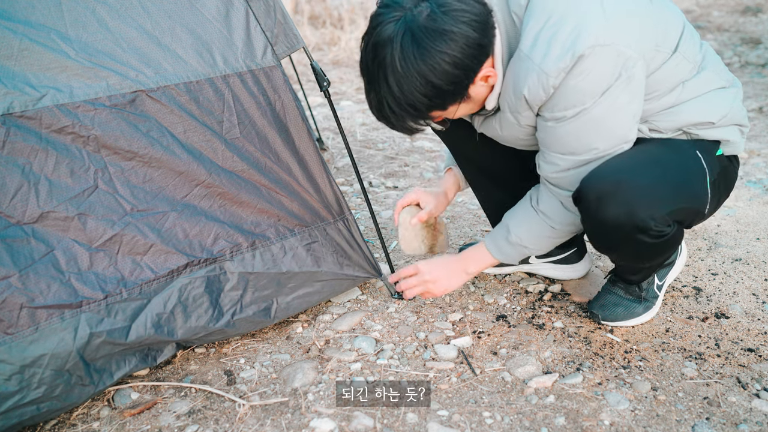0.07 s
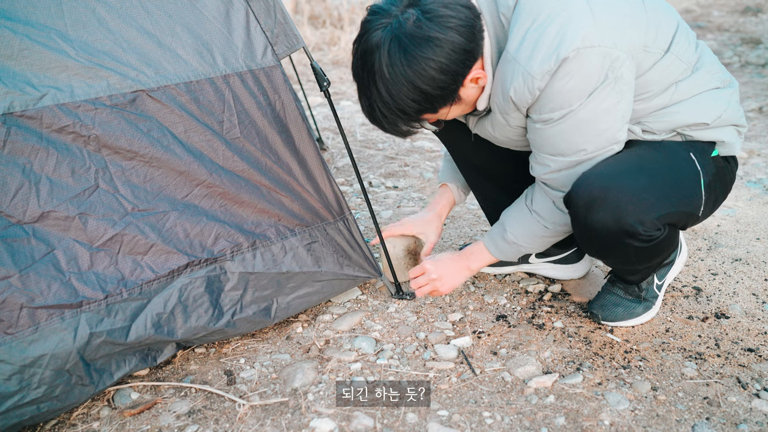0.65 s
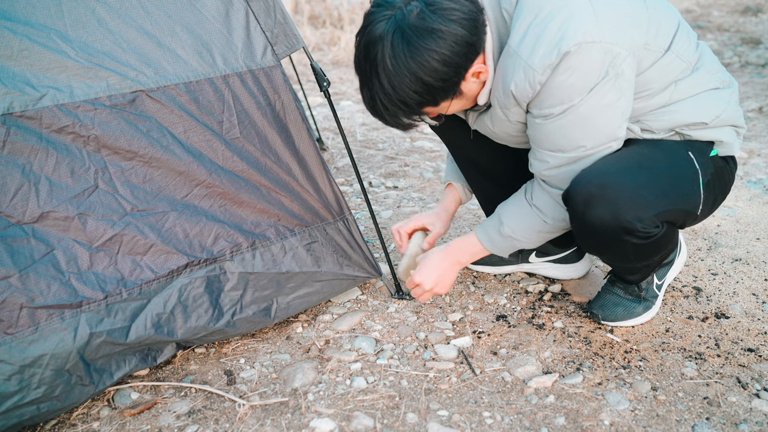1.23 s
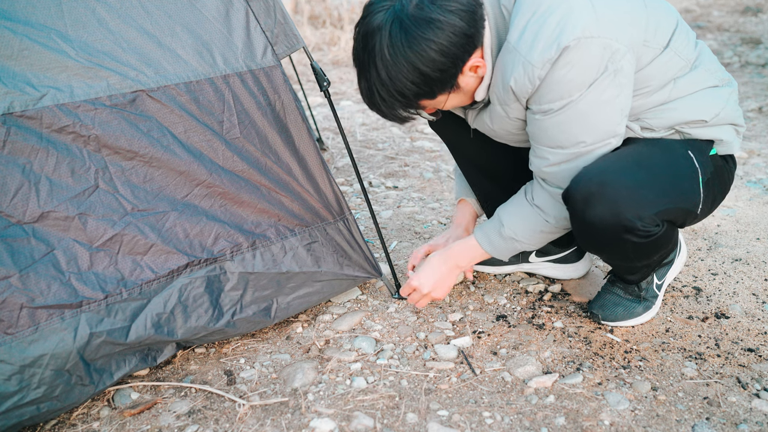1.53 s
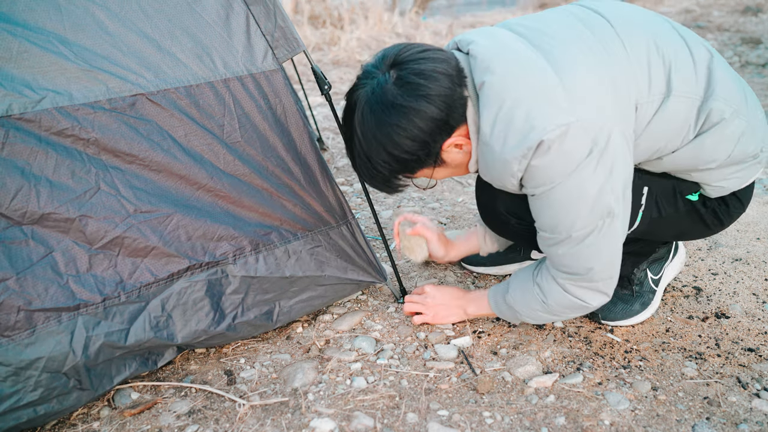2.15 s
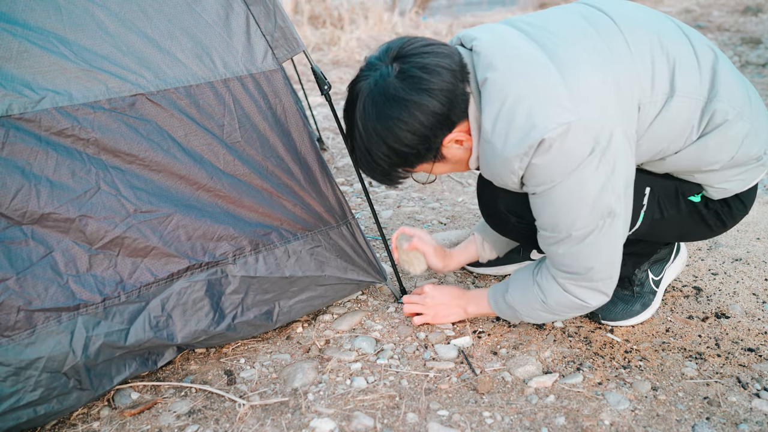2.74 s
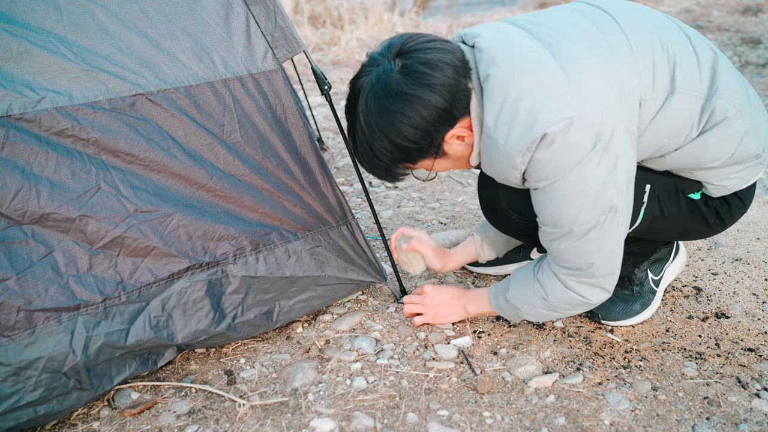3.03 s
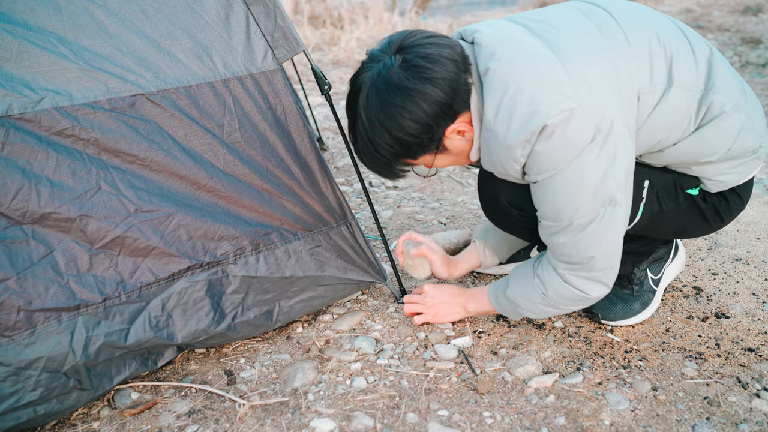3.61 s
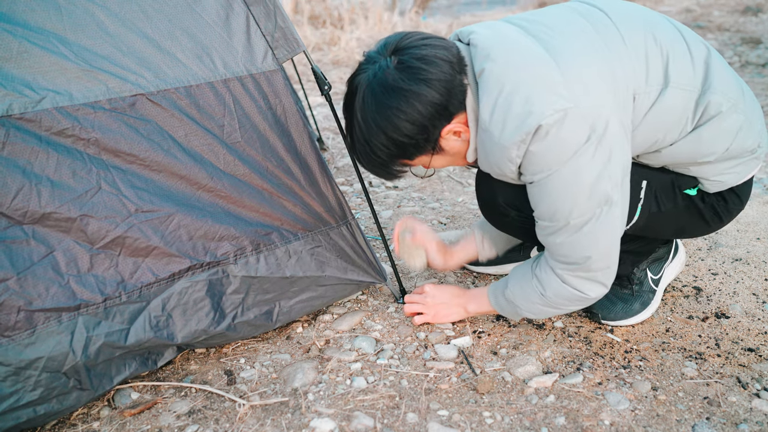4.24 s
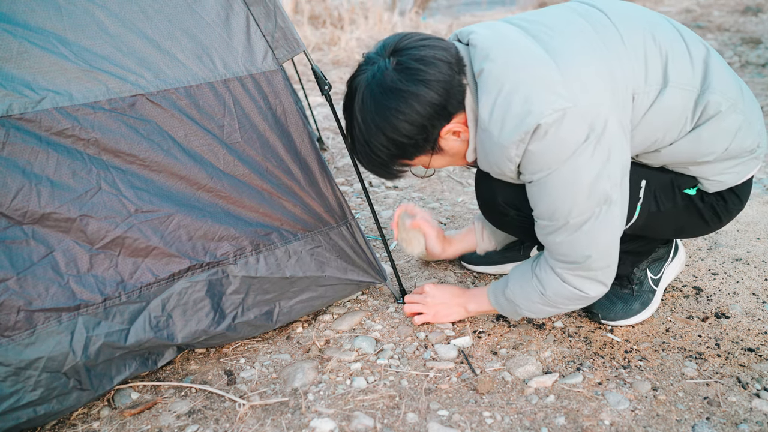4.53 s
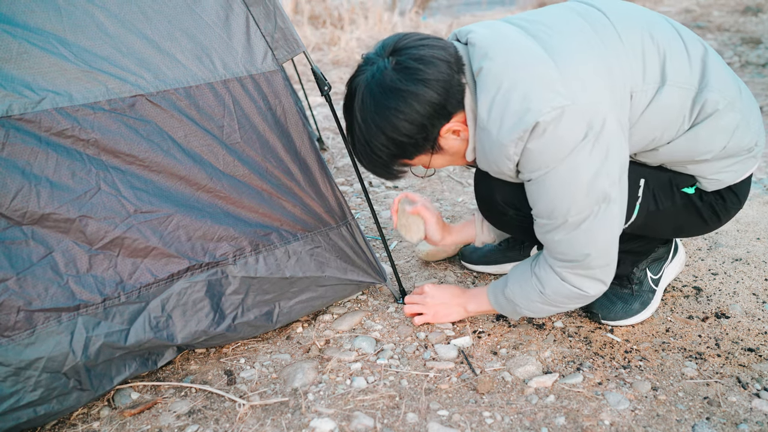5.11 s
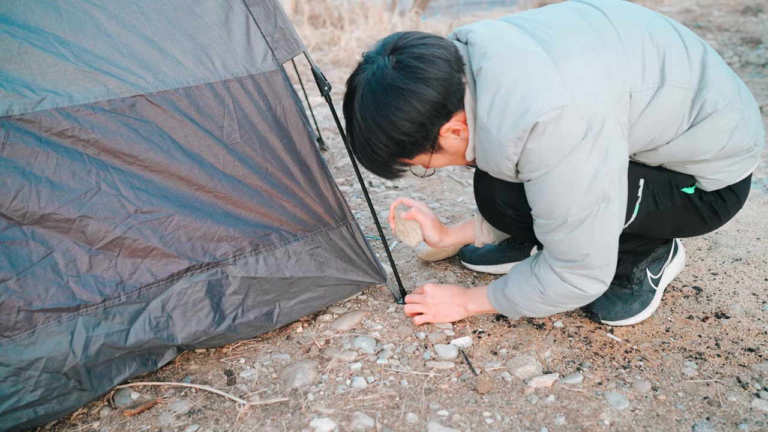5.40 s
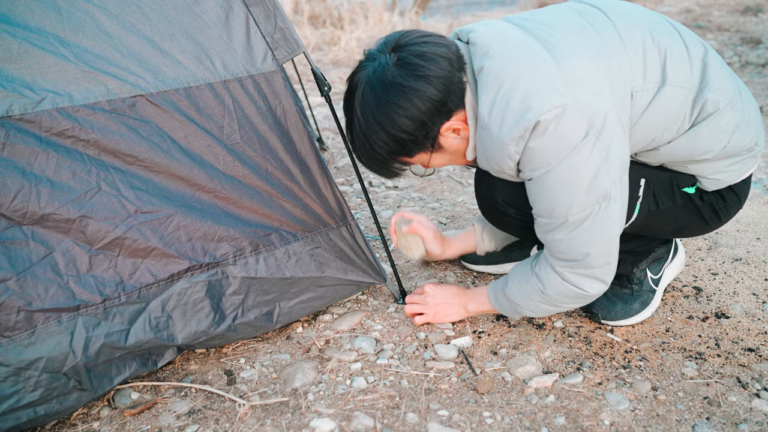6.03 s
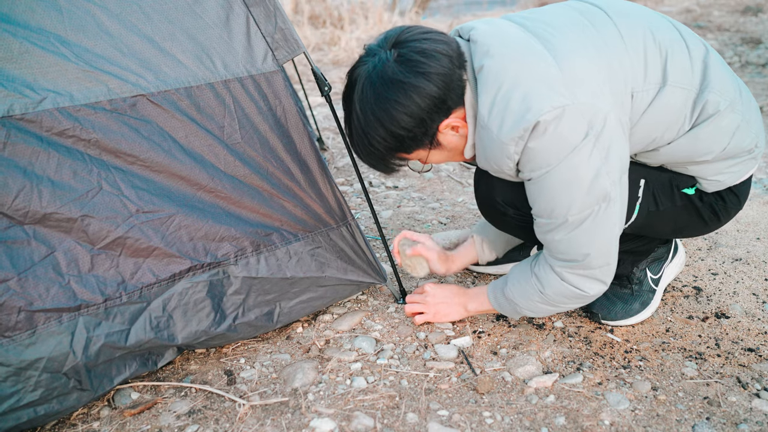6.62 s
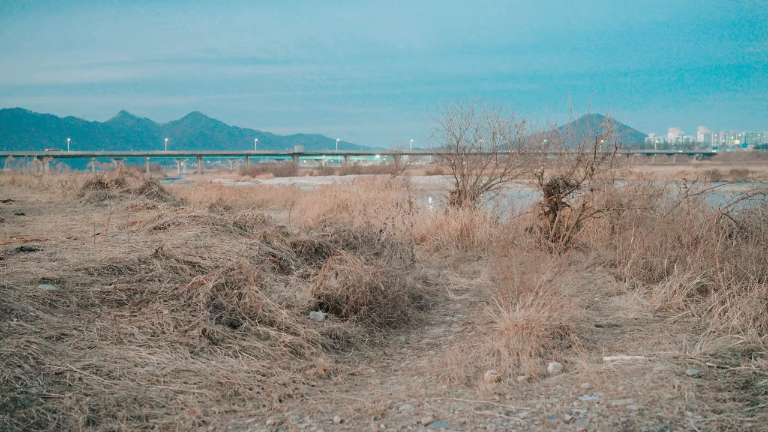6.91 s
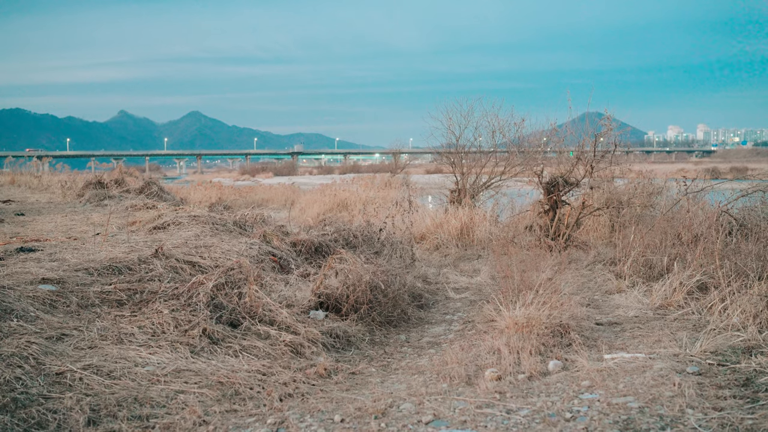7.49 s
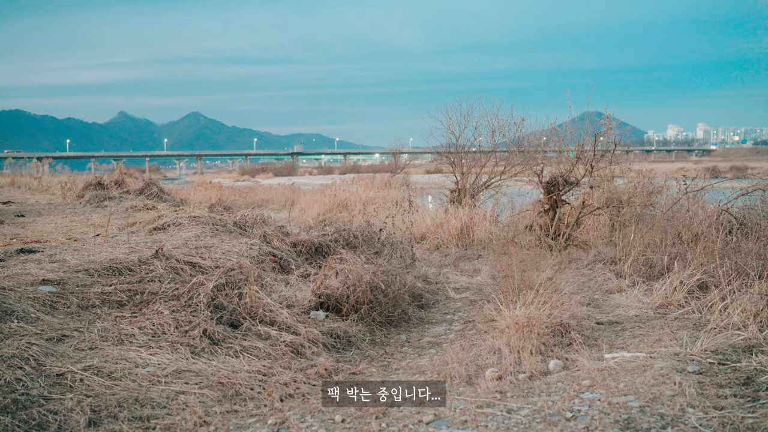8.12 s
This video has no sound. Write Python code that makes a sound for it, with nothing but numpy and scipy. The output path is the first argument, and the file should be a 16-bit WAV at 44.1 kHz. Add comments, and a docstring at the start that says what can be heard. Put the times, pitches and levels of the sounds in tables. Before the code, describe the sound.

A faint, low outdoor murmur runs throughout. For the first two seconds, hands slide over nylon tent fabric in uneven, crackly strokes, while pebbles click and a steel peg scrapes softly against soil and stone. At about 2.5 seconds a rock starts knocking the peg into the stony ground: fourteen evenly spaced blows, about three a second, until roughly 6.7 seconds. These are the loudest sounds. Each has a short, high metal clink, a crunch of grit and a dull thud, and the thuds sink slightly in pitch as the peg goes deeper. Sometimes the rock skids and clinks again, and a padded sleeve swishes faintly between blows. At about 7 seconds the background changes to a quiet riverside with a faint rush of far traffic. Soft dry rustling comes and goes, with two small ticks, until the end at about 8.4 seconds.

```python
"""A rock knocks a steel tent peg into stony ground: fourteen blows, each with a short clink
from the peg, a crunch of grit and a falling thud from the soil. Before that, hands slide over
the nylon tent corner and set the peg; between blows a padded sleeve swishes.
A low murmur lies under everything. At the end the scene changes to an open riverside
with dry rustling and far traffic."""
import sys
import numpy as np
from scipy import signal
from scipy.fft import rfft, irfft, next_fast_len
from scipy.io import wavfile

SR = 44100
rng = np.random.default_rng(int(sys.argv[2]) if len(sys.argv) > 2 else 0)


def transcribe(signal):
    """Save signal, clipped to [-1, 1], as a 16-bit WAV file at the path in sys.argv[1]."""
    frames = np.atleast_2d(signal).T
    limited = np.clip(frames, -1, 1)
    pcm = np.round(limited * 32767).astype(np.int16)
    wavfile.write(sys.argv[1], SR, pcm)


N = 363951
TIME = np.arange(N) / SR  # seconds since the start
AGE = np.arange(SR // 4) / SR  # seconds since one short sound began


def undb(db):
    """Turn decibels into a number to multiply by."""
    return 10 ** (np.asarray(db) / 20)


def noise(spectrum, size, grain_db=0):
    """Noise of strength (rms) 1, shaped by (Hz, dB) points; grain_db makes it uneven and crackly."""
    grains = undb(grain_db * np.minimum(rng.exponential(size=size), 2 * np.pi))
    white = rng.standard_normal(size) * grains
    hz, db = np.transpose(spectrum)
    padded = next_fast_len(size)
    f = np.maximum(np.fft.rfftfreq(padded, 1 / SR), 1)
    bass_cut = np.minimum(f / hz[0], 1) ** 2
    gain = undb(np.interp(np.log(f), np.log(hz), db)) * bass_cut
    shaped = irfft(rfft(white, padded) * gain, padded)[:size]
    return shaped / shaped.std()


def flutter(rate_hz, depth_db):
    """A loudness that wanders at random."""
    points = rng.standard_normal(1024)
    return undb(depth_db * np.interp(TIME * rate_hz, np.arange(len(points)), points))


def fade(t60, rise_s):
    """A quick smooth rise, and a fall of 60 dB every t60 seconds."""
    return (1 - np.exp(-AGE / rise_s)) ** 2 * np.exp(-np.log(1000) * AGE / t60)


def swell(t, centre, width):
    """A bell-shaped rise and fall."""
    return np.exp(-0.5 * ((t - centre) / width) ** 2)


def stroke(start, length, attack_s, release_s):
    """The loudness of a slide: it gathers speed, holds and dies away."""
    since = TIME - start
    return np.clip(since / attack_s, 0, 1) * np.exp(-np.maximum(since - length, 0) / release_s)


def add(track, t, sound):
    """Mix a sound into the track at t seconds."""
    i = int(t * SR)
    track[i:i + len(sound)] += sound[:N - i]


# tone of the low and the middle part of the murmur: f/Hz, level/dB
LOW_TONE = [(25, -23.5), (60, -6), (130, 0), (200, 0.5), (400, -3), (600, -13), (1000, -16.5),
            (2200, -22.5), (4000, -24), (6000, -24), (9000, -31.5), (15500, -37)]
MIDDLE_TONE = [(150, -9.5), (400, 2.5), (650, -0.5), (1050, -8.5), (1700, -22.5), (4000, -56)]
# stretches of background, the last at the riverside: start t/s, low level/dB, middle level/dB
BACKGROUNDS = [(0, -50.5, -62), (2.16, -51.5, -56), (6.97, -52, -73)]
RIVERSIDE_S = BACKGROUNDS[-1][0]
def outdoors():
    """A low distant murmur that differs a little from one stretch to the next."""
    start, low_db, middle_db = np.transpose(BACKGROUNDS)
    now = np.searchsorted(start[1:], TIME)
    low = undb(low_db[now]) * flutter(5.8, 0.32) * noise(LOW_TONE, N)
    middle = undb(middle_db[now]) * flutter(7.0, 0.72) * noise(MIDDLE_TONE, N)
    return low + middle


# tone of rubbed nylon and of scraped soil: f/Hz, level/dB
NYLON_TONE = [(800, -16.5), (2500, -10), (4000, -7), (5500, 3), (7000, -1.5), (8300, -12.5), (10000, -28.5),
              (15500, -31.5)]
SCRAPE_TONE = [(100, -0.5), (300, 7), (750, -2), (1650, -4), (2800, -10.5), (5000, -18), (12000, -45)]
# hand movements: start t/s, length/s, nylon level/dB, scrape level/dB
HAND_STROKES = [(0.0, 0.02, -59, -52), (0.14, 0.1, -68, -72), (0.377, 0.13, -48.5, -51.5),
                (0.45, 0.066, -53.5, -52), (0.672, 0.025, -43, -49), (0.802, 0.037, -45.5, -53),
                (0.898, 0.063, -42, -53), (0.943, 0.018, -60, -63), (1.025, 0.054, -62, -54.5),
                (1.248, 0.15, -60.5, -61), (1.49, 0.22, -64, -55), (1.547, 0.03, -72, -55),
                (1.718, 0.32, -64, -75.5)]
def handling():
    """Nylon slides under the hands in uneven, crackly strokes while the peg scrapes the soil."""
    nylon = flutter(70.95, 2.9) * noise(NYLON_TONE, N, grain_db=5)
    scrape = flutter(60.2, 0.9) * noise(SCRAPE_TONE, N, grain_db=5)
    out = np.zeros(N)
    for t, length, nylon_db, scrape_db in HAND_STROKES:
        movement = stroke(t, length, attack_s=0.031, release_s=0.031)
        out += movement * (undb(nylon_db) * nylon + undb(scrape_db) * scrape)
    return out


# tone of a knocked pebble: f/Hz, level/dB
PEBBLE_TONE = [(120, -9.5), (230, 1), (420, 0.5), (900, -38), (3000, -58)]
# pebble and cloth ticks: t/s, knock level/dB, clack level/dB, snap level/dB
SMALL_TICKS = [(0.367, -30, -44, -52), (.456, -32.5, -46.5, -50), (.508, -28.5, -36.5, -42),
               (0.513, -33, -40, -33), (.634, -33, -44.5, -47), (0.6984, -39, -45, -29.5),
               (0.8323, -41, -60, -30.5), (0.893, -36, -42, -48), (0.911, -38.5, -47, -32),
               (.941, -45, -36, -40), (0.983, -47, -45, -34), (1.107, -39, -46, -43),
               (1.378, -47, -59, -39.5), (1.489, -46, -43, -44), (1.544, -35.5, -42, -58),
               (1.574, -34, -40, -48), (1.592, -50, -43, -57), (1.872, -51, -51.5, -42),
               (2.165, -35, -54, -51), (7.504, -58, -59.5, -34), (7.753, -43, -45, -40)]
def pebbles_and_folds():
    """Pebbles knock and clack, and folds of cloth snap, each in a tiny burst of noise."""
    out = np.zeros(N)
    for t, knock_db, clack_db, snap_db in SMALL_TICKS:
        knock = undb(knock_db) * noise(PEBBLE_TONE, len(AGE)) * fade(0.038, rise_s=0.00084)
        clack = undb(clack_db) * noise(SCRAPE_TONE, len(AGE)) * fade(0.037, rise_s=0.00004)
        snap = undb(snap_db) * noise(NYLON_TONE, len(AGE)) * fade(0.0071, rise_s=0.00005)
        add(out, t, knock + clack + snap)
    return out


# tone of the thin ring: f/Hz, level/dB
THIN_RING_TONE = [(1200, -25), (1440, -4), (1550, -3), (1700, -8), (2000, -25), (3000, -70)]
def thin_ring():
    """A faint, thin ring hangs in the air while the peg is set."""
    loudness = undb(-60) * stroke(start=0.49, length=0.33, attack_s=0.015, release_s=0.08)
    return loudness * noise(THIN_RING_TONE, N)


# tone of steel rubbing stone: f/Hz, level/dB
STONE_TONE = [(700, -21), (1090, 0), (1300, -7), (1550, 2), (2100, 1), (2800, -21), (6000, -40)]
# short rubs: t/s, half length/s, level/dB
STONE_RUBS = [(0.512, 0.0072, -48), (0.94, 0.008, -54), (1.587, 0.012, -43.5)]
def grating():
    """The peg grates against a buried stone."""
    loudness = sum(undb(db) * swell(TIME, t, width) for t, width, db in STONE_RUBS)
    return loudness * noise(STONE_TONE, N, grain_db=6.5)


def soft_push(track, t, db, hz, half_s):
    """Add a soft, low bump of air or ground that peaks at t seconds."""
    lead_s = 4 * half_s
    bump = np.cos(2 * np.pi * hz * (AGE - lead_s)) * swell(AGE, lead_s, half_s)
    add(track, t - lead_s, undb(db) * bump)


# notes of the bending peg, cut short by soil and hand: f/Hz, level/dB, time to fade 60 dB/s
PEG_NOTES = [(480, -2, 0.0078), (1380, -11, 0.0078), (1860, -16, 0.016), (2060, -31.5, 0.023),
             (3353, -14, 0.029), (4090, -6.5, 0.018), (4675, -11.5, 0.013), (4786, 0.5, 0.02),
             (4890, -16, 0.01), (5640, -11, 0.041), (6460, -11, 0.014), (7200, -18.5, 0.012),
             (8400, -26.5, 0.015), (10030, -33, 0.022), (10960, -32, 0.021)]
# tone of crushed stone: f/Hz, level/dB
CRACK_TONE = [(500, 0), (1400, 11), (2000, -4), (2500, -53.5), (3200, -8.5), (4800, 2), (6000, -2.5),
              (7200, 9), (8200, -8.5), (9400, -19.5), (11000, -15), (13000, -23.5), (15000, -46.5)]
RING_HZ, RING_RISE_HZ_PER_S, SOIL_GRIP_HZ = 4714, 45, 35
def clink(t, ring_db, crack_db):
    """Rock hits steel: stone cracks and the peg rings, higher as its free end gets shorter."""
    hz, db, t60 = np.transpose(PEG_NOTES)[:, :, None]
    level_luck, pitch_luck = rng.standard_normal((2, len(PEG_NOTES), 1))
    grip_hz = SOIL_GRIP_HZ * rng.standard_normal()  # the soil's grip shifts the pitch on each hit
    main_hz = RING_HZ + RING_RISE_HZ_PER_S * (t - ROCK_BLOWS[0][0]) + grip_hz
    hz = hz * main_hz / hz[db.argmax()] * (1 + 0.003 * pitch_luck)
    notes = undb(db + 3 * level_luck) * np.sin(2 * np.pi * hz * AGE) * fade(t60, rise_s=0.00037)
    # the rock stays pressed on the peg and chokes much of the ring within milliseconds
    choke = 0.23 + 0.77 * swell(AGE, 0, 0.0023)
    crack = noise(CRACK_TONE, len(AGE)) * fade(0.016, rise_s=0.00024)
    return undb(ring_db) * choke * notes.sum(0) + undb(crack_db) * crack


# tone of rumbling soil: f/Hz, level/dB
SOIL_TONE = [(25, -24.5), (55, -11), (100, -3.5), (180, -5), (270, -3.5), (380, -7), (560, -18.5),
             (1200, -37.5), (3000, -54.5)]
CREST_S, GLIDE_S, HEAVE_HZ, RUMBLE_DB = 0.00888, 0.018, 89, -9.5
def thud(db, hz, heave_db):
    """Soil carries short waves fastest, so the thud swells late and sinks in pitch over a deep heave."""
    cycles = hz * GLIDE_S * (1 - np.exp((CREST_S - AGE) / GLIDE_S))  # the pitch passes hz at CREST_S
    body = np.cos(2 * np.pi * cycles) * swell(AGE, CREST_S, 0.0033) * (1 - np.exp(-AGE / 0.0016))
    heave_shape = swell(AGE, 0.013, 0.0079) * (1 - np.exp(-AGE / 0.002))
    heave = np.cos(2 * np.pi * HEAVE_HZ * (AGE - CREST_S)) * heave_shape
    rumble = noise(SOIL_TONE, len(AGE)) * fade(0.155, rise_s=0.009)
    return undb(db) * (body + undb(RUMBLE_DB) * rumble) + undb(heave_db) * heave


# tone of crunching grit: f/Hz, level/dB
GRIT_TONE = [(200, 2.5), (500, 2.5), (850, -6.5), (1500, -11), (2150, -11), (2520, -23.5), (3150, -14),
             (4500, -14), (7000, -21.5), (9000, -34.5), (15000, -43.5)]
# blows of the rock: t/s, then level/dB of ring, crack, grit, knock, thud and heave
ROCK_BLOWS = [(2.451, -19.5, -45, -28.5, -41, -23, -34), (2.7708, -17.5, -31.5, -28, -34, -13, -38),
              (3.079, -19.5, -30, -28, -27, -12.5, -38), (3.3873, -21, -26, -30, -26, -13.5, -30.5),
              (3.7063, -14, -19.5, -30, -23, -11.5, -28.5), (4.0332, -13, -22.5, -25, -20.5, -10, -26),
              (4.3661, -14, -21, -28, -28, -10.5, -27), (4.6903, -18, -20.5, -27.5, -40, -12, -34),
              (4.9998, -20, -24, -24.5, -15, -19, -29.5), (5.309, -13, -24.5, -28.5, -27, -11, -37),
              (5.641, -20, -26.5, -29, -19, -15.5, -43), (5.9856, -16.5, -18, -27, -14.5, -13, -32.5),
              (6.3412, -20, -27, -29, -34, -12, -30), (6.684, -16.5, -21.5, -28.5, -13, -11.5, -26)]
THUD_HZ, THUD_DROP_HZ_PER_BLOW = 254.5, 3.1  # the thud gets lower as the peg goes deeper
KNOCK_HZ, USUAL_RING_DB = 465, -17.5
def hammering():
    """Every blow rings the peg, grinds grit along its side and shakes the ground."""
    out = np.zeros(N)
    # rock and peg together give a hollow knock on the ground
    knock = np.sin(2 * np.pi * KNOCK_HZ * AGE) * fade(0.019, rise_s=0.00068)
    for count, (t, ring_db, crack_db, grit_db, knock_db, thud_db, heave_db) in enumerate(ROCK_BLOWS):
        # the swinging arm pushes a little air ahead of the rock
        soft_push(out, t - 0.0055, db=thud_db - 21.5, hz=177.6, half_s=0.0021)
        add(out, t, clink(t, ring_db, crack_db) + undb(knock_db) * knock)
        grit = noise(GRIT_TONE, len(AGE), grain_db=4) * fade(0.1, rise_s=0.00046)
        add(out, t, undb(grit_db) * grit)
        add(out, t, thud(thud_db, THUD_HZ - THUD_DROP_HZ_PER_BLOW * count, heave_db))
        # the ground springs back once, later after a harder blow
        delay_s = 0.053 + 0.0012 * (ring_db - USUAL_RING_DB)
        soft_push(out, t + delay_s, db=-28.5, hz=187, half_s=0.0018)
    return out


# extra touches of the rock: t/s, ring level/dB
ROCK_SKIDS = [(2.4543, -35), (2.4553, -24), (2.7793, -29), (2.7808, -34), (3.7250, -39), (4.0388, -31),
              (4.0505, -29), (4.3695, -27), (5.0020, -15), (5.0041, -17.5), (5.0060, -30), (5.0125, -32),
              (5.3187, -32)]
def skidding():
    """Just after some blows the rock skids and clinks on the peg again."""
    out = np.zeros(N)
    for t, db in ROCK_SKIDS:
        add(out, t, clink(t, ring_db=db, crack_db=db - 6))
    return out


# tone of the padded sleeve: f/Hz, level/dB
SLEEVE_TONE = [(400, 0.5), (1100, 7.5), (2200, -1), (3500, 0.5), (6000, -1), (7500, -8.5), (10000, -16),
               (15000, -35)]
# hard down-swings: t/s, half length/s, level/dB
ARM_SWINGS = [(2.775, 0.014, -58), (3.701, 0.024, -49), (3.985, 0.014, -51), (4.972, 0.016, -49),
              (5.267, 0.03, -46), (5.572, 0.013, -60), (6.667, 0.026, -69)]
LIFT_AFTER_S, LIFT_DB = 0.12, -55.5
def sleeve():
    """The sleeve brushes the jacket as the arm lifts between blows, and on hard down-swings."""
    lifts = sum(swell(TIME, t + LIFT_AFTER_S, 0.027) for t, *_ in ROCK_BLOWS[1:-1])
    swings = sum(undb(db) * swell(TIME, t, width) for t, width, db in ARM_SWINGS)
    up = undb(LIFT_DB) * lifts * noise(SLEEVE_TONE, N, grain_db=3)
    down = swings * noise(NYLON_TONE, N, grain_db=4.5)
    return up + down


# tone of far traffic: f/Hz, level/dB
ROAD_TONE = [(150, -35), (550, -5.5), (750, -3.5), (1000, -0.5), (1150, -9), (1450, -12), (1900, -26),
             (4000, -36)]
def far_road():
    """Tyres on a far road make a steady rush, heard only at the riverside."""
    return undb(-53) * (TIME > RIVERSIDE_S) * flutter(9.1, 1.0) * noise(ROAD_TONE, N)


# tone of the rustling: f/Hz, level/dB
RUSTLE_TONE = [(200, 1.5), (1000, 2.5), (1800, -5), (2400, -2.5), (3100, -4), (4500, -3), (6800, -2.5),
               (8200, -11), (10000, -24), (15500, -32)]
# sweeps of rustling: start t/s, length/s, level/dB
RUSTLES = [(7.046, 0.094, -54.5), (7.14, 0.35, -48.5), (7.544, 0.23, -49), (7.694, 0.076, -47),
           (7.953, 0.027, -57), (8.188, 0.06, -42)]
def dry_rustling():
    """Soft, dry rustling comes and goes at the riverside."""
    sweeps = sum(undb(db) * stroke(t, length, attack_s=0.11, release_s=0.078)
                 for t, length, db in RUSTLES)
    return sweeps * flutter(40, 0.71) * noise(RUSTLE_TONE, N, grain_db=3)


def scene():
    """All sounds sit in the centre; the level dips briefly where the scene changes."""
    mono = outdoors() + handling() + pebbles_and_folds() + thin_ring() + grating()
    mono += hammering() + skidding() + sleeve() + far_road() + dry_rustling()
    mono *= 1 - 1.03 * swell(TIME, RIVERSIDE_S, 0.0043)
    return np.array([mono, mono])


def record(dry):
    """Left and right each get their own faint hiss, and the highest treble is cut."""
    hiss = undb(-62.5) * rng.standard_normal(dry.shape)
    treble_cut = signal.ellip(10, 0.1, 70, 15900, fs=SR, output="sos")
    return signal.sosfilt(treble_cut, dry + hiss)


dry = scene()
out = record(dry)
transcribe(out)
```